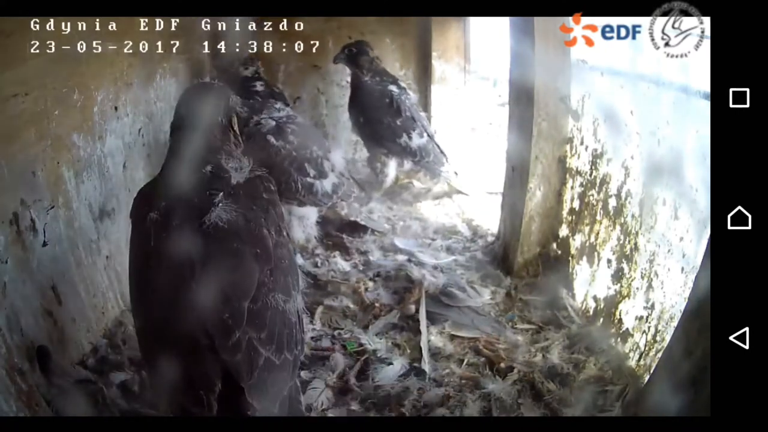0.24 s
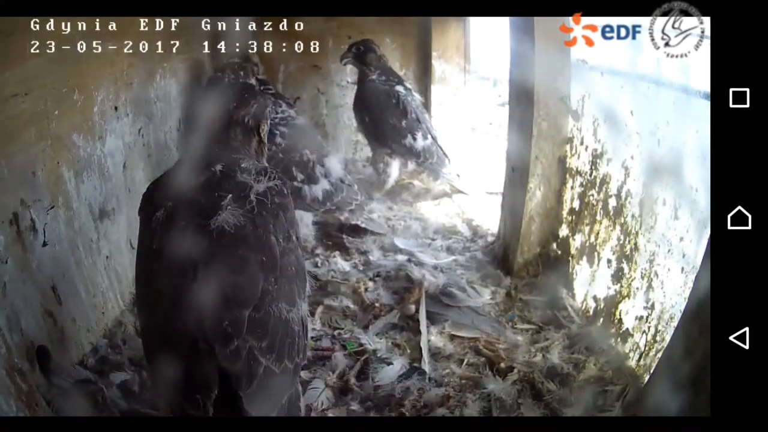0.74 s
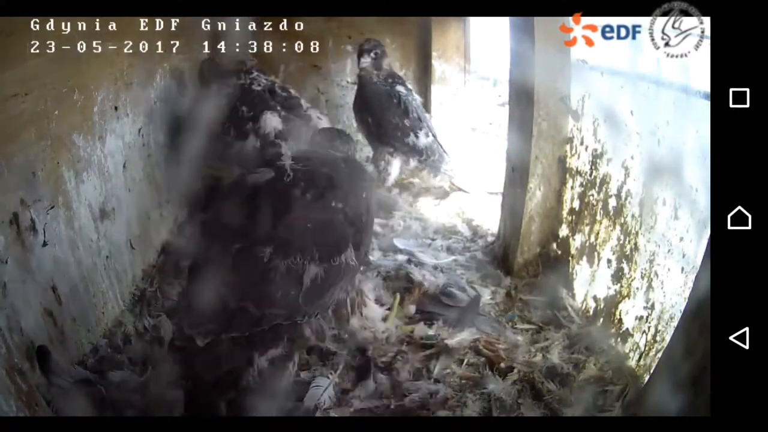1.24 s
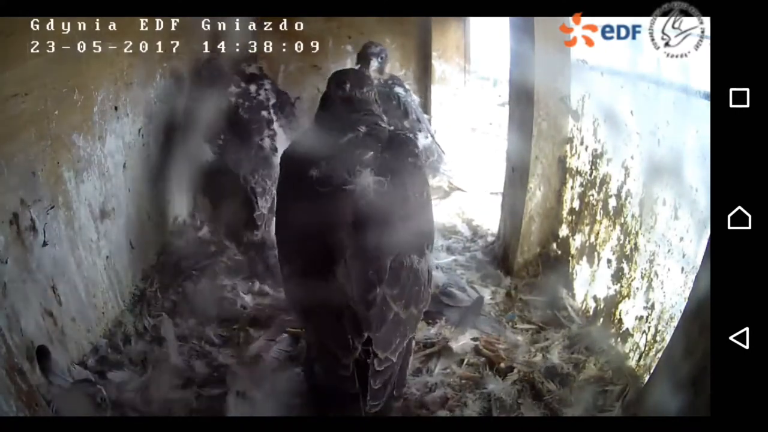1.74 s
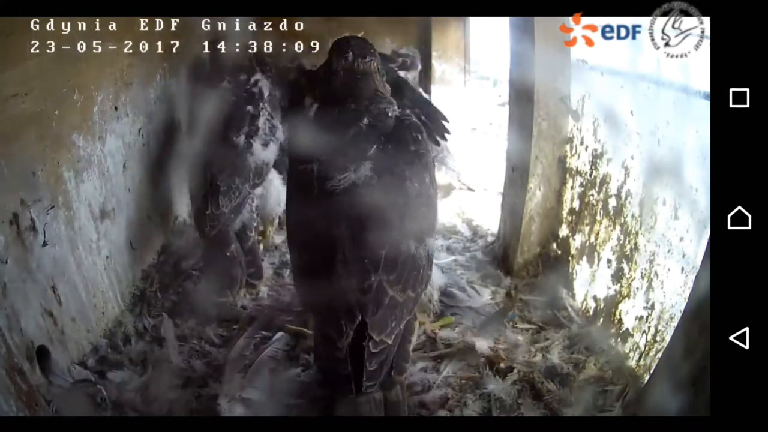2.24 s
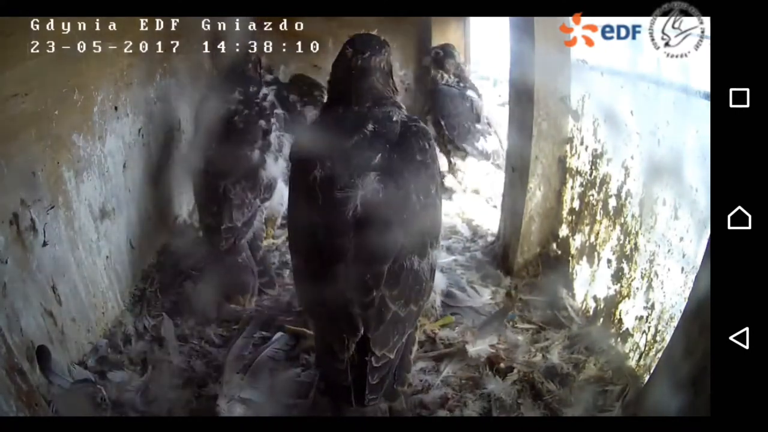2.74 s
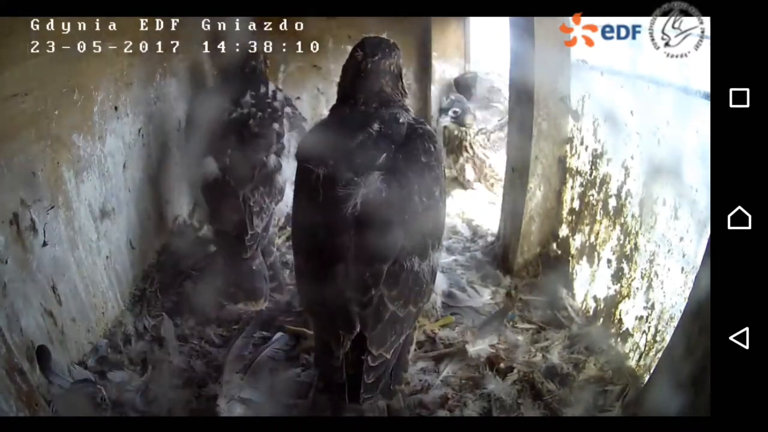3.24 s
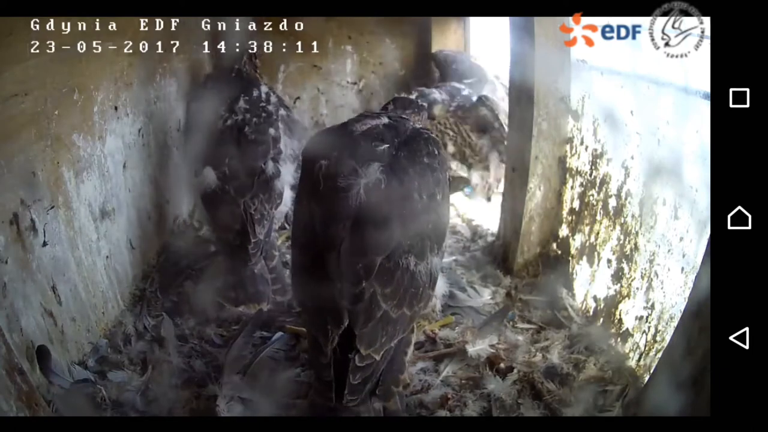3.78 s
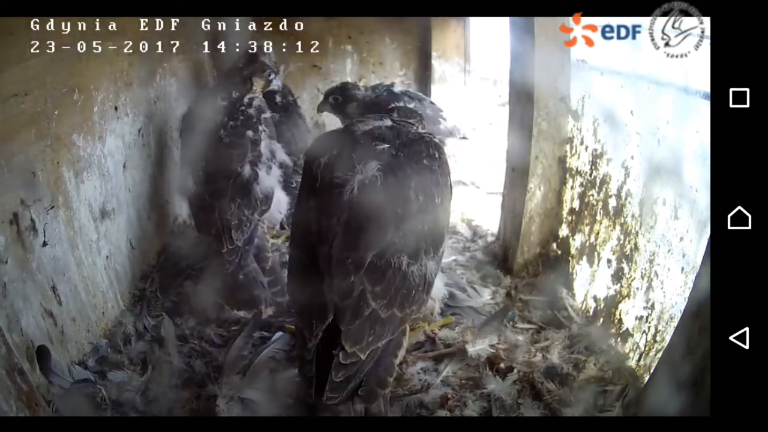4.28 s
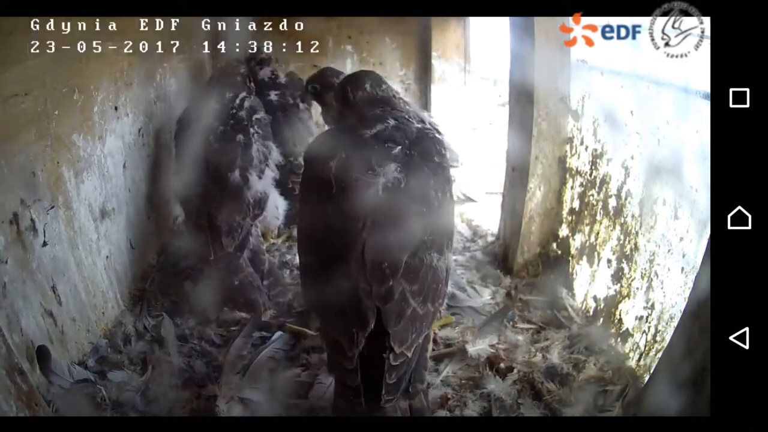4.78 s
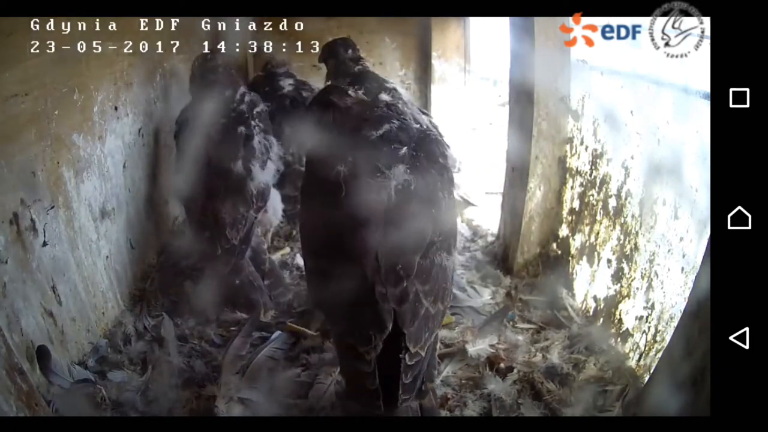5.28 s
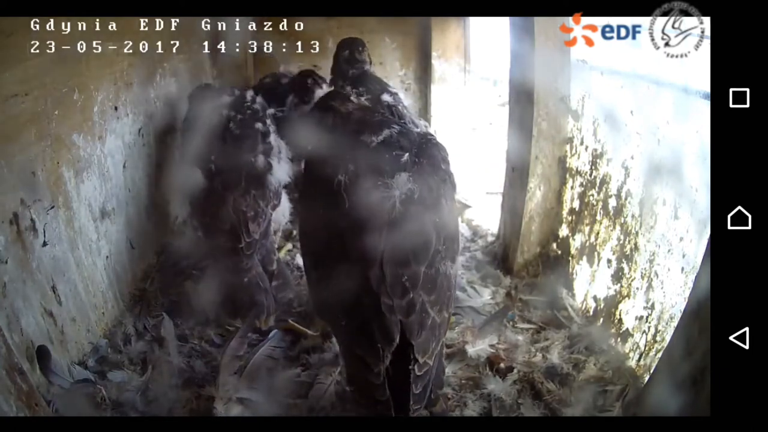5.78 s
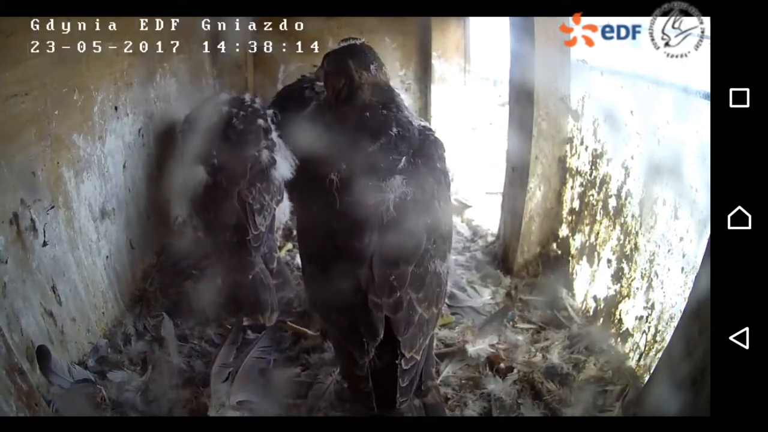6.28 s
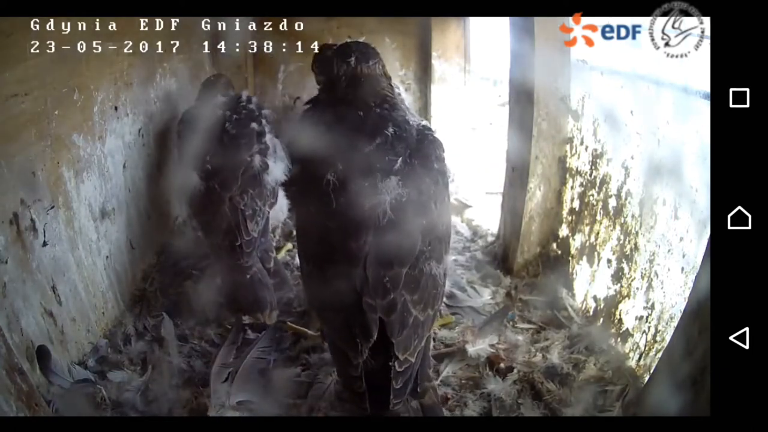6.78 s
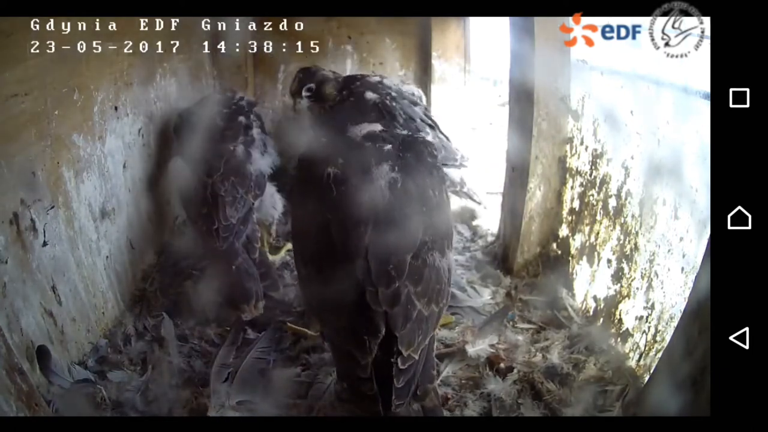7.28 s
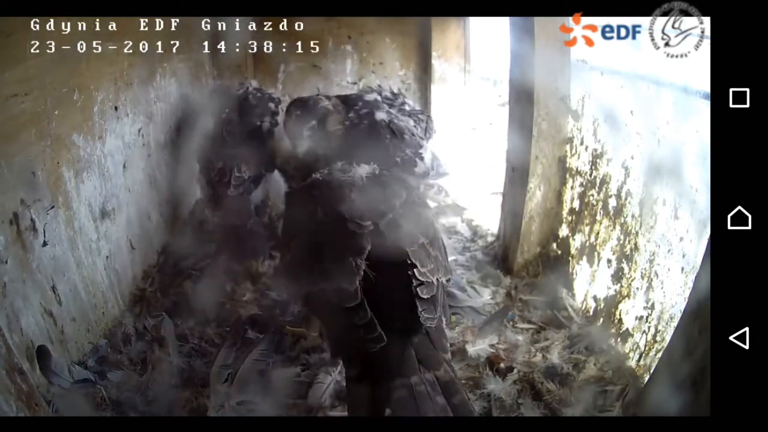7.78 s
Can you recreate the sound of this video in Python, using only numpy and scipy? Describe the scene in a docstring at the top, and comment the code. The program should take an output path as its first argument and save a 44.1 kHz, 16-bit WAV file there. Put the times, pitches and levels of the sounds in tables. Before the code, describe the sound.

Overloaded, tinny screeches of squabbling young birds of prey, with shuffling and sharp knocks on boards, a mid-way lull, then more screams over hiss.

```python
"""Young falcons over a small speaker

Young falcons scream, whistle, shuffle and knock in a wooden nest box: rough tones over throbbing rasp,
thin tones near 3 kHz, clumped grains and short rattles of noise. The box microphone overloads a
telephone-band stream, which a small phone speaker plays, clipping again, into the same phone's microphone
in a quiet room. The speaker's amplifier hums and thumps; hiss, mains hum and a thin whine run throughout."""
import sys
import numpy as np
from scipy import signal
from scipy.fft import rfft, irfft
from scipy.io import wavfile
from scipy.ndimage import uniform_filter1d

SR = 44100
rng = np.random.default_rng(int(sys.argv[2]) if len(sys.argv) > 2 else 0)


def magnitude_from_level(level_db):
    """Linear magnitude for a level in decibels (20 dB per decade)."""
    exponent = np.asarray(level_db, float) / 20
    return 10 ** exponent


def output_pcm(signal):
    """Save a mono or channel-first signal as 16-bit PCM at the path in sys.argv[1].

    Samples are clipped to [-1, 1] before scaling.
    """
    pcm = np.clip(np.atleast_2d(signal).T, -1, 1) * 32767
    wavfile.write(sys.argv[1], SR, np.round(pcm).astype(np.int16))


N = 353682
T = np.arange(N) / SR
WAVER_SHARE, WAVER_HZ = 0.018, 25  # rms size (complex) of the pitch waver at full roughness, bandwidth


def colour_db(points, hz):
    """A spectrum read on a log-frequency axis."""
    f, db = np.transpose(points)
    return np.interp(np.log(np.maximum(hz, 1)), np.log(f), db)


def shape(x, response):
    """Causal minimum-phase filter from a dB response, by way of its cepstrum."""
    size = 4096
    hz = np.arange(size // 2 + 1) * SR / size
    ceps = irfft(np.log(magnitude_from_level(response(hz))))
    ceps[1:size // 2] *= 2
    ceps[size // 2 + 1:] = 0
    impulse = irfft(np.exp(rfft(ceps)))
    return signal.fftconvolve(x, impulse)[:len(x)]


def unit(x):
    """Scale to rms 1."""
    return x / np.sqrt(np.mean(np.abs(x) ** 2))


def low_pass(x, order, hz):
    """Butterworth low-pass."""
    return signal.sosfilt(signal.butter(order, hz, fs=SR, output="sos"), x)


def band_pass(x, order, low_hz, high_hz):
    """Butterworth band-pass."""
    return signal.sosfilt(signal.butter(order, [low_hz, high_hz], "bandpass", fs=SR, output="sos"), x)


def flutter(width_hz):
    """Complex low-passed noise of rms 1: wobbles size and phase of a tone."""
    noise = rng.standard_normal(N) + 1j * rng.standard_normal(N)
    return unit(low_pass(noise, 2, width_hz))


def read(table, edge_s=0.00083):
    """Columns over time, and a gate that is open along the table."""
    s, *columns = np.transpose(table)
    gate = np.clip(np.minimum(T - s[0], s[-1] - T) / edge_s, 0, 1)
    return gate, [np.interp(T, s, c) for c in columns]


def partial(hz, db, rough, wobble):
    """A tone, part steady and part fluttering; db is rms."""
    rough = np.clip(rough, 0, 1)
    swing = np.sqrt(1 - rough) + np.sqrt(rough) * wobble
    tone = np.exp(2j * np.pi * np.cumsum(hz) / SR) * swing
    return np.sqrt(2) * magnitude_from_level(db) * tone.real


def room():
    """Steady room and microphone hiss, a mains hum and a thin electronic whine."""
    # Hiss colour. Each row: frequency in Hz, relative density in dB.
    hiss_colour = [(40, -11), (160, -16), (400, -6), (900, 1), (1500, -11.5), (2400, -16), (3100, -12),
                   (4500, -17.5), (7000, -13.5), (8400, -14.5), (10000, -7.5), (11200, -16), (16000, -19.5)]
    # Hum and whine. Each row: frequency in Hz, rms level in dB.
    steady_tones = [(100, -70), (9231, -63)]
    hiss_db = -56
    hiss = unit(shape(rng.standard_normal(N), lambda hz: colour_db(hiss_colour, hz)))
    tones = sum(np.sqrt(2) * magnitude_from_level(db) * np.sin(2 * np.pi * hz * T) for hz, db in steady_tones)
    return magnitude_from_level(hiss_db) * hiss + tones


def boards(x):
    """The boards ring briefly: decaying modes, peak scaled to 1."""
    # Board modes. Each row: frequency in Hz, relative level in dB, 60 dB decay time in seconds.
    modes = [(360, 1, 0.23), (523, 19, 0.037), (740, 29.5, 0.009), (940, 2, 0.17), (1316, 9.5, 0.018),
             (1520, -33, 0.037)]
    t = T[:SR // 8]
    ring = sum(magnitude_from_level(db - 60 * t / t60) * np.sin(2 * np.pi * hz * t) for hz, db, t60 in modes)
    return signal.fftconvolve(x, ring / np.abs(ring).max())[:N]


def shuffles():
    """Feet and feathers in the litter: dense small grains of uneven size, partly carried by the boards."""
    # One table per shuffle. Each row: time in seconds, level in dB.
    shuffle_levels = [
        [(0.0, -38), (0.132, -65), (0.2, -56)],
        [(2.33, -46), (2.526, -29.5), (2.68, -46.5)],
        [(3.16, -29.5), (3.246, -40), (3.408, -49), (3.504, -39.5), (3.64, -54), (3.842, -44.5), (4.102, -58.5),
         (4.4, -111)],
    ]
    grains_per_s = 900
    struck = rng.random(N) < grains_per_s / SR
    grains = struck * rng.standard_normal(N) * magnitude_from_level(2 * rng.exponential(size=N))
    litter = unit(boards(grains)) + magnitude_from_level(-7) * unit(low_pass(grains, 4, 1300))
    level = 0
    for table in shuffle_levels:
        gate, (db,) = read(table)
        level = level + gate * magnitude_from_level(db)
    clumps = np.abs(flutter(10.6)) ** 0.8
    return level * litter * clumps


def walls(x, wet_db, t60):
    """Walls add a decaying noise tail, silent for its first 2 ms."""
    t = T[:SR // 2]
    tail = rng.standard_normal(len(t)) * magnitude_from_level(-60 * t / t60) * (t > .002)
    return x + magnitude_from_level(wet_db) * signal.fftconvolve(x, tail / np.sqrt(np.sum(tail ** 2)))[:N]


def stream(x):
    """Telephone band: 8000 samples a second, clipped, then interpolated so peaks overshoot."""
    top = magnitude_from_level(-12)
    low = np.clip(signal.resample_poly(x, 80, 441), -top, top)
    taps = signal.firwin(441 * 48 + 1, 3750, window=("kaiser", 8), fs=8000 * 441)
    back = signal.resample_poly(low, 441, 80, window=taps)[:N]
    return np.pad(back, (0, N - len(back)))


def speaker(x):
    """The overshoots clip and spit treble, the stiffening cone bends the wave, the housing colours it."""
    # Smooth response. Each row: frequency in Hz, gain in dB.
    smooth_response = [(100, -26.5), (250, -20.5), (450, -12), (800, -3.5), (1100, -1), (2000, -9.5),
                       (3300, -11.5), (4500, -9), (6000, -7), (8000, -3), (9300, -1.5), (10500, 4),
                       (13300, -7), (16000, 0)]
    # Housing resonances and cancellations. Each row: centre in Hz, width in Hz, gain in dB.
    housing_peaks = [(335, 116, 11), (900, 87, -2.5), (1900, 63, 6), (1150, 880, 2), (1491, 48, -18),
                     (1740, 77, 2), (2515, 35, 8.5), (2387, 220, -16), (2950, 1030, 11), (6920, 990, 11.5),
                     (12170, 1450, 6.5)]
    top = magnitude_from_level(-12.5)

    def response_db(hz):
        """Smooth response plus the housing's peaks and dips."""
        peaks = sum(db / (1 + (2 * (hz - f) / width) ** 2) for f, width, db in housing_peaks)
        return colour_db(smooth_response, hz) + peaks

    driven = np.clip(x / top, -1, 1)
    bent = driven - magnitude_from_level(-16) * driven ** 3  # adds third overtones
    return shape(top * bent, response_db)


def screams():
    """Up to four partials of a rough voice box over a rasp that throbs with the first one's flutter."""
    # One table per scream, the last by a lower sibling. Each row: time in seconds, held pitch in Hz,
    # level in dB, brightness in dB as the beak opens.
    scream_paths = [
        [(0.217, 1000, -31.5, -28), (0.32, 1075, -26, -4), (0.42, 1135, -21, -6), (0.52, 1150, -16.5, 0),
         (0.64, 1182, -13.5, -5), (0.75, 1170, -15.5, -9.5), (0.785, 1155, -11, 9), (0.822, 1136, -11, -55)],
        [(1.065, 1006, -37, -5), (1.15, 1041, -27, -12), (1.25, 1060, -18, -7.5), (1.4, 1100, -21.5, -5),
         (1.5, 1116, -19.5, -4), (1.6, 1150, -17.5, -1), (1.68, 1134, -14, -4)],
        [(1.825, 1015, -35.5, -7), (1.95, 1012, -22, -10), (2.05, 1096, -24, 1.5), (2.11, 1150, -18.5, 0),
         (2.16, 1050, -26.5, -51), (2.25, 1048, -29, -11), (2.36, 1116, -20.5, -28)],
        [(2.655, 1040, -37.5, -6), (2.76, 964, -30.5, -15), (2.82, 1018, -24, -5.5), (2.95, 1047, -17.5, -5.5),
         (3.05, 1113, -12, -6.5), (3.12, 1113, -12, -0.5), (3.18, 1072, -12, -30)],
        [(4.79, 954, -44, -22), (4.93, 964.5, -44.5, -9.5), (5.04, 1008, -44, -1.5), (5.25, 1027, -39.5, -1.5),
         (5.65, 1040, -39, -3), (5.75, 1116, -37, 5), (5.92, 1234, -37, 9), (6.06, 1310, -31.5, 4),
         (6.13, 1337, -17, -8)],
        [(6.388, 1074, -42, -13), (6.5, 1150, -34.5, -8.5), (6.62, 1256, -33.5, 2), (6.76, 1225, -28, -6),
         (6.9, 1223, -23.5, -5.5), (7.05, 1231, -23, -3), (7.2, 1258, -20.5, -5), (7.34, 1274, -18, -2.5),
         (7.39, 1256, -20, 3)],
        [(7.585, 1160, -30.5, -17.5), (7.7, 1208, -25, 0.5), (7.8, 1223, -26.5, -12), (7.9, 1217, -24.5, -5),
         (8.1, 1211, -21, -6)],
        [(7.78, 950, -36, -22), (7.88, 925, -21.5, -12), (7.95, 925, -23, -32), (8.1, 920, -30, -25)],
    ]
    # Octave of each scream. Each row: time in seconds, level against the scream's in dB.
    octave_levels = [
        [(.23, -2.5), (.32, -11), (.42, 6.5), (.64, -11), (.78, 0)],
        [(1.1, -23), (1.4, -5), (1.65, 4)],
        [(1.84, -1), (1.95, -7.5), (2.1, 8), (2.16, -42)],
        [(2.7, -9.5), (2.95, 2), (3.12, 3)],
        [(4.8, 9.5), (4.9, -0.5), (5.25, -0.5), (5.75, 8.5), (5.95, 12.5), (6.1, 1)],
        [(6.4, 18), (6.5, 8), (6.65, 2), (6.9, 12.5), (7.2, 4.5), (7.35, 3)],
        [(7.6, 1), (7.7, 14.5), (7.8, 2.5), (8.0, 10)],
        [(7.8, -4), (7.88, -3.5), (7.95, -33)],
    ]
    # Voice of each scream. Each row: first partial's bark at the onset in dB, third partial in dB,
    # growl in dB, rasp in dB (all against its level), roughness from 0 to 1.
    voice_rows = [(10, -11.5, -24, -5.5, 0.71), (-5, -17, -24, -6, 0.93), (23.5, -23, -11.5, -6, 0.83),
                  (-13, -5, -15, -4.5, 0.62), (1, -5, 1, 0, .6), (-14, 0, -9.5, -6.5, 0.46),
                  (10, 3.5, -8, -6, 0.41), (7, 0, -29, -22, 0.31)]
    attack_s, release_s, bark_s = 0.0078, 0.028, 0.004
    scoop, scoop_s, droop, droop_s = 0.11, 0.03, 0.236, 0.061  # shares of pitch lost at start and end
    third_opens = 0.89  # dB gained per dB of brightness
    fourth_db = -15.5  # against the octave
    clears, clears_db = 0.7, -9  # in the droop: share of roughness lost, change of growl and rasp
    surge_db, octave_dies_db = 3, -23.5  # in the droop: first partial swells, upper ones give out
    rasp_late_db, rasp_late_s = -3, 0.025  # growl and rasp come in behind the tone

    wobbles = [flutter(110), flutter(50), flutter(194)]
    hiss = None
    # Rasp colour. Each row: frequency in Hz, relative level in dB.
    rasp_colour = [(200, -2.5), (700, -5.5), (1600, 10.5), (2800, -6), (3900, -4.5)]
    hiss = shape(rng.standard_normal(N), lambda hz: colour_db(rasp_colour, hz))
    hiss = hiss * (.5 + 3.4 * np.abs(wobbles[0]))
    low = unit(low_pass(hiss, 4, 2350))
    high = unit(band_pass(hiss, 4, 2350, 4000))
    growl = flutter(184)
    waver = WAVER_SHARE * flutter(WAVER_HZ).real
    throb = magnitude_from_level(1.9 * flutter(55).real)  # the whole voice flickers in level
    out = 0
    for table, octave, voice_row in zip(scream_paths, octave_levels, voice_rows):
        bark_db, third_db, growl_db, rasp_db, rough = voice_row
        gate, (hz, db, bright_db) = read(table)
        since, left = np.abs(T - table[0][0]), np.abs(table[-1][0] - T)
        ending = np.maximum(1 - left / droop_s, 0)
        drooped = np.minimum(2 * ending, 1)

        hz = hz * (1 - scoop * np.exp(-since / scoop_s) - droop * ending + rough * waver)
        rough = rough * (1 - clears * drooped)
        noise_db = clears_db * drooped + rasp_late_db * np.exp(-since / rasp_late_s)
        db = db - 40 * (np.maximum(1 - since / attack_s, 0) + np.maximum(1 - left / release_s, 0))

        bark = bark_db * np.exp(-((since - attack_s) / bark_s) ** 2)
        dying_db = octave_dies_db * ending ** 2
        octave_db = db + np.interp(T, *np.transpose(octave)) + dying_db
        upper_db = db + third_db + dying_db + third_opens * bright_db
        voice = partial(hz, db + surge_db * drooped + bark, rough, wobbles[0])
        voice += partial(2 * hz, octave_db, .7 * rough, wobbles[1])  # the cleanest
        voice += partial(3 * hz, upper_db, 1.58 * rough, wobbles[2])
        # the fourth sounds only while it lies inside the stream's band
        voice += (hz < 1000) * partial(4 * hz, octave_db + fourth_db, rough, wobbles[1])
        # the rasp gathers into a growl below the pitch
        voice += partial(.78 * hz, db + growl_db + noise_db, 1.0, growl)
        rasp = magnitude_from_level(db + noise_db) * (magnitude_from_level(rasp_db) * low + magnitude_from_level(bright_db) * high)
        out = out + gate * throb * (voice + rasp)
    return out


def whistles():
    """A second, thinner oscillation near 3 kHz that rides on some screams at its own pitch."""
    # One table per whistle. Each row: time in seconds, pitch in Hz, level in dB.
    whistle_paths = [
        [(0.232, 2590, -38), (0.26, 2770, -38), (0.34, 2925, -29.5), (0.52, 3050, -30), (0.72, 3022, -20),
         (0.79, 3042, -54), (0.805, 2880, -35)],
        [(1.07, 2650, -43), (1.1, 2674, -37), (1.25, 2891, -30), (1.34, 2890, -22), (1.41, 2820, -21),
         (1.48, 2950, -23.5), (1.62, 2936, -18), (1.67, 2940, -53)],
        [(1.84, 2710, -33.5), (1.9, 2782, -24.5), (2.0, 2880, -25.5), (2.12, 2965, -20), (2.17, 2905, -31),
         (2.24, 3130, -33), (2.29, 3027, -33.5), (2.335, 2850, -31)],
        [(2.655, 2764, -45), (2.68, 2950, -25.5), (2.72, 2934, -26), (2.775, 2750, -22), (2.8, 3060, -23),
         (2.87, 3000, -24), (2.92, 3090, -16), (2.99, 2850, -25)],
        [(5.03, 2950, -55), (5.1, 3040, -40.5), (5.3, 3140, -38), (5.55, 3172, -37), (5.75, 3330, -37.5),
         (5.85, 3300, -45)],
    ]
    rough = 0.507
    wobble, waver = flutter(65), WAVER_SHARE * flutter(WAVER_HZ).real
    out = 0
    for table in whistle_paths:
        gate, (hz, db) = read(table)
        out = out + gate * partial(hz * (1 + rough * waver), db, rough, wobble)
    return out


def awake_spans(x):
    """(on s, off s) of an amplifier that wakes late on a sound and holds on a moment."""
    wake_db, wake_s, hold_s = -39.5, 0.012, 0.042  # rms threshold, delay, hold
    loud = uniform_filter1d(x ** 2, SR // 100) > magnitude_from_level(wake_db) ** 2
    hold = int(hold_s * SR)
    awake = np.convolve(np.cumsum(loud), np.r_[1, np.zeros(hold - 1), -1])[:N] > 0
    edges = np.flatnonzero(np.diff(np.r_[0, awake, 0])).reshape(-1, 2) / SR
    runs_on = edges[:, 1:] > T[-1]  # still awake at the end: off moves 1 s later
    return edges + [wake_s, 0] + runs_on * [0, 1]


def amplifier_hum(spans):
    """A 40 Hz sway while the amplifier is awake, a quick swing as it wakes, a bigger one as it lets go."""
    hum_hz, hum_db = 40.3, -48
    thump_hz, thump_s, wake_db, off_db = 62, 0.0092, -43.5, -37
    out = 0
    for on, off in spans:
        gate = np.clip(np.minimum(T - on, off - T) / 0.0039, 0, 1)
        wake_bump = np.exp(-((T - on - thump_s) / thump_s) ** 2)
        off_bump = np.exp(-((T - off) / thump_s) ** 2)
        out = out + magnitude_from_level(hum_db) * gate * np.sin(2 * np.pi * hum_hz * (T - on))
        out = out + magnitude_from_level(wake_db) * wake_bump * np.sin(2 * np.pi * thump_hz * (T - on))
        out = out - magnitude_from_level(off_db) * off_bump * np.sin(2 * np.pi * thump_hz * (T - off))
    return out


def knocks():
    """Claws and beaks on the boards: short noise rattles, dull through the wood, bright as a crack."""
    # Each row: start in seconds, thud level in dB, crack level in dB, rattle decay constant in seconds.
    blows = [(2.334, -23, -17, 0.012), (2.43, -40.5, -48, 0.012), (2.487, -34.5, -26, 0.0094),
             (2.547, -37, -26.5, 0.021), (2.715, -36.5, -60, 0.021), (3.23, -31, -26, 0.0049),
             (3.279, -47, -73, 0.012), (3.399, -50, -43, 0.033), (3.461, -33, -53, 0.0068),
             (3.532, -44.5, -46, 0.03), (3.665, -45, -40, 0.014), (3.735, -48, -60, 0.012),
             (3.795, -19, -16, 0.0061), (3.807, -45, -42, 0.006), (3.915, -50.5, -34.5, 0.0095),
             (4.398, -74, -30.5, 0.0043)]
    dull, bright = np.zeros(N), np.zeros(N)
    size = 3000
    for s, thud_db, crack_db, rattle_s in blows:
        i = int(s * SR)
        envelope = np.exp(-T[:size] / rattle_s) * np.minimum(T[:size] / 0.00065, 1)
        rattle = rng.standard_normal(size) * envelope
        dull[i:i + size] += magnitude_from_level(thud_db) * rattle
        bright[i:i + size] += magnitude_from_level(crack_db) * rattle
    return boards(dull) + band_pass(bright, 2, 2300, 3900)


def scene():
    """The nest box through stream and speaker, in the room."""
    nest = walls(shuffles() + screams() + whistles() + knocks(), wet_db=-13, t60=0.076)
    played = speaker(stream(nest))
    hum = amplifier_hum(awake_spans(played))
    return (walls(played, wet_db=-26, t60=0.37) + hum + room())[None]


def band_limit(x):
    """A steep low-pass at the top of the band."""
    return signal.sosfilt(signal.butter(12, 15830, fs=SR, output="sos"), x)


def record(dry):
    """A steep cut above 15.75 kHz and a small constant offset."""
    cut = signal.sosfilt(signal.ellip(12, .2, 80, 15750, fs=SR, output="sos"), dry)
    mix = cut - .0009
    return band_limit(mix)


dry = scene()
out = record(dry)
output_pcm(out)
```